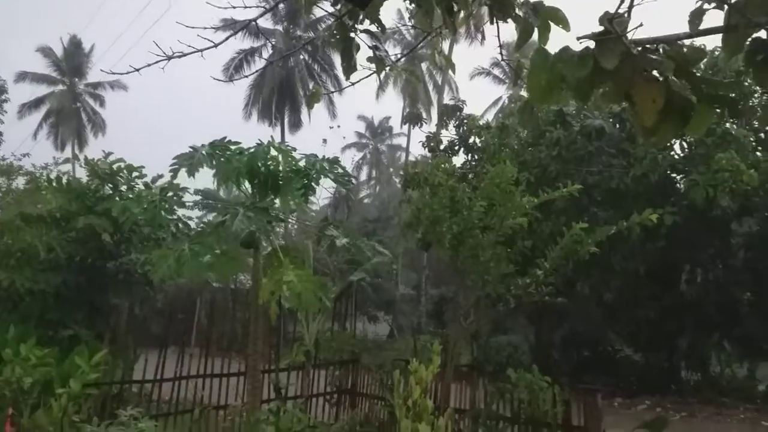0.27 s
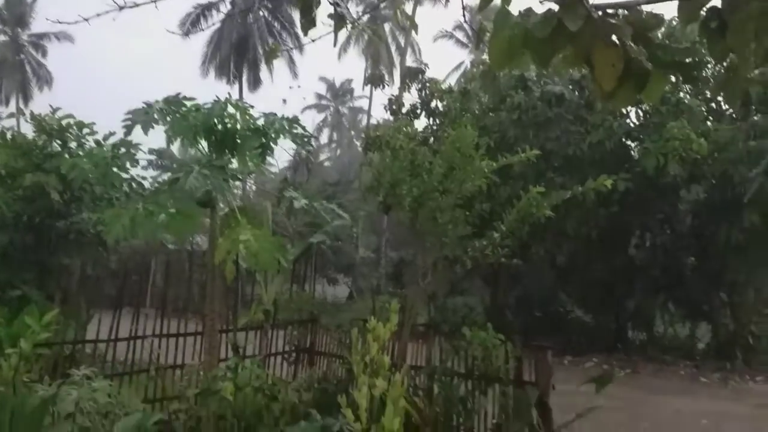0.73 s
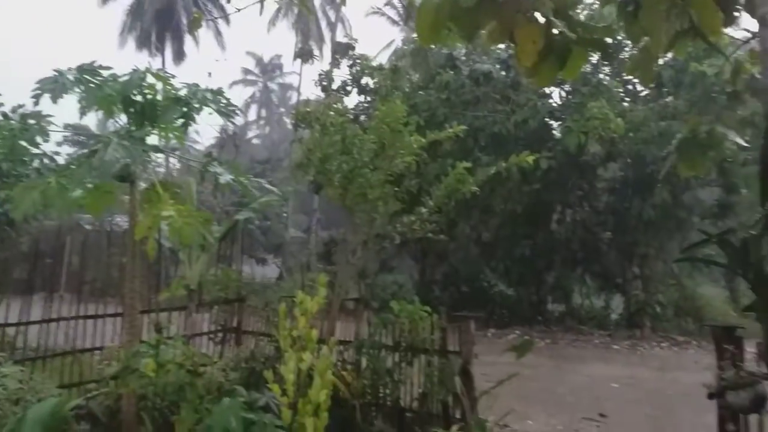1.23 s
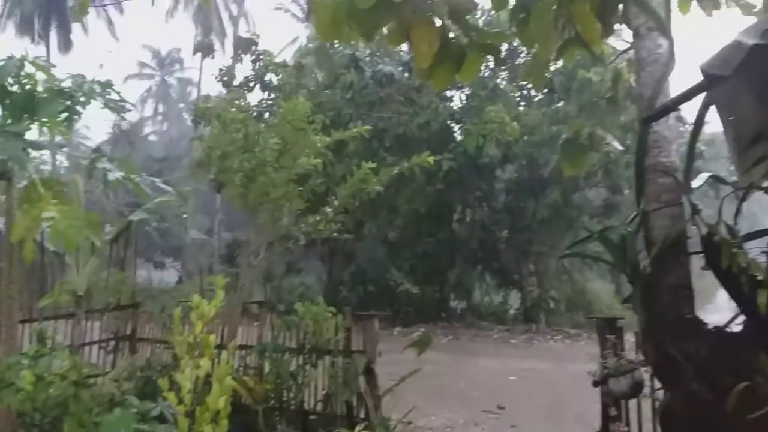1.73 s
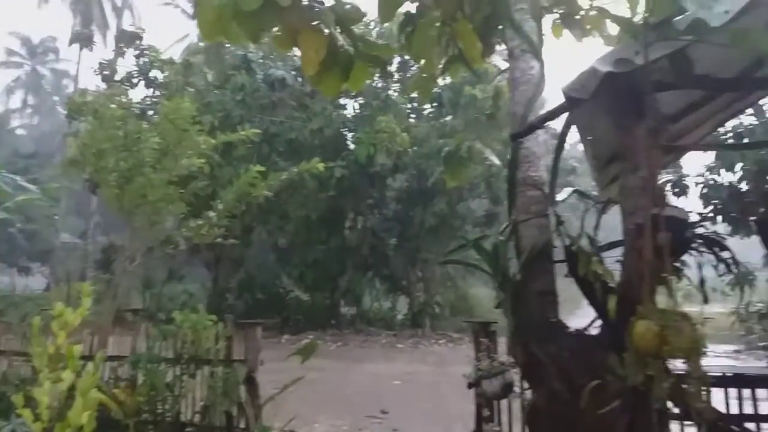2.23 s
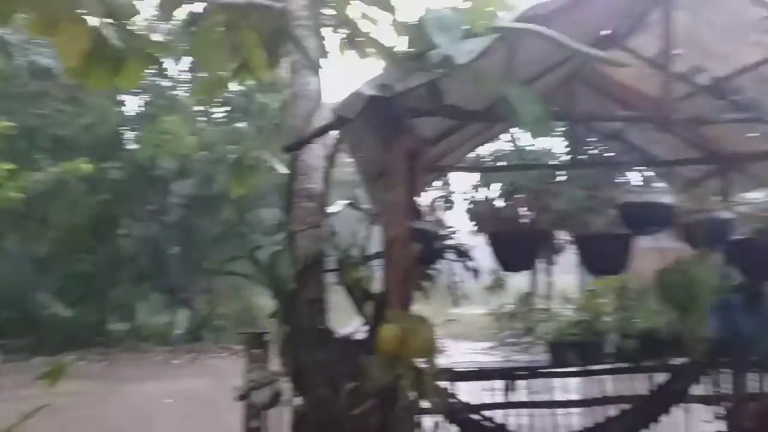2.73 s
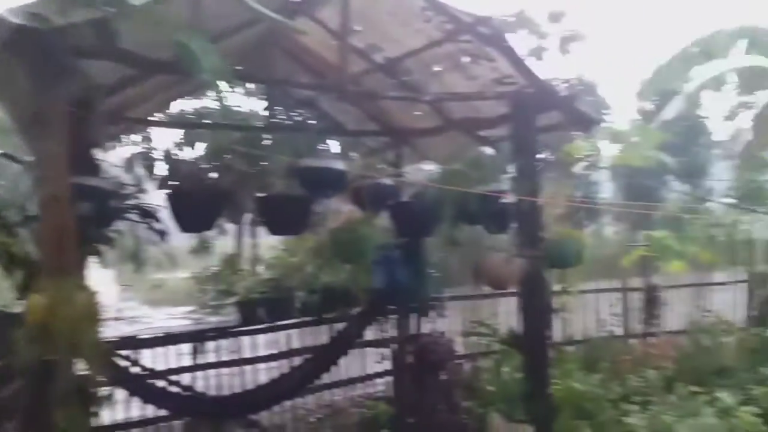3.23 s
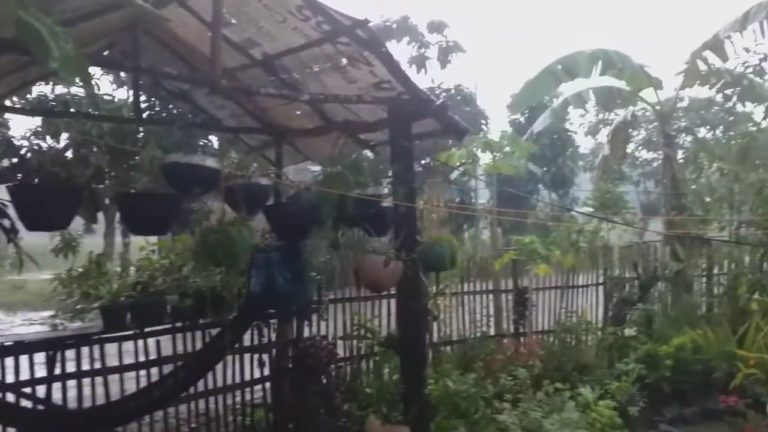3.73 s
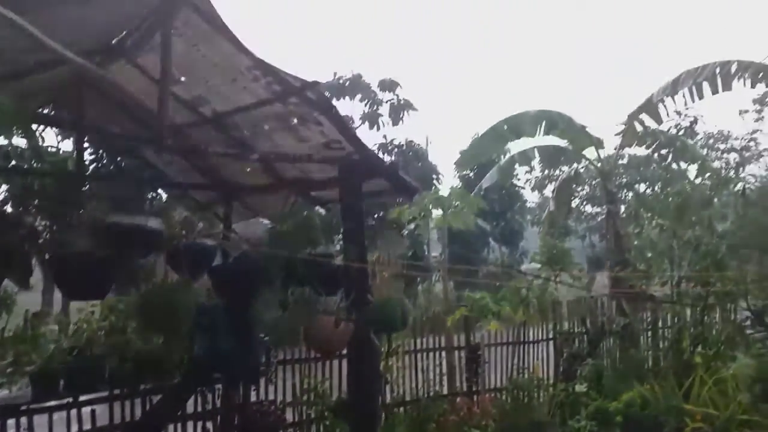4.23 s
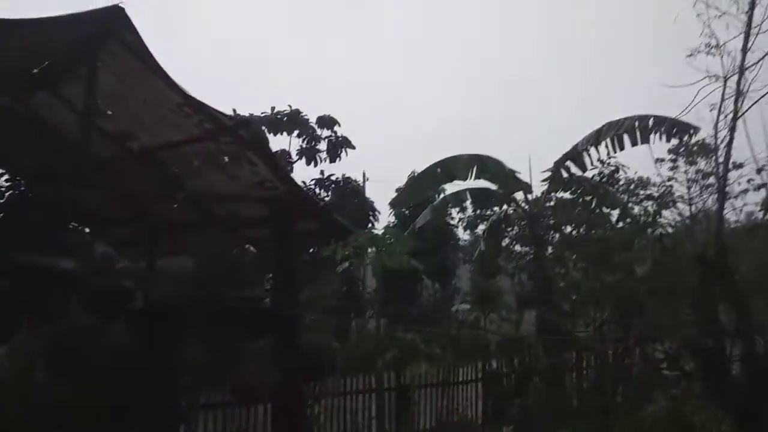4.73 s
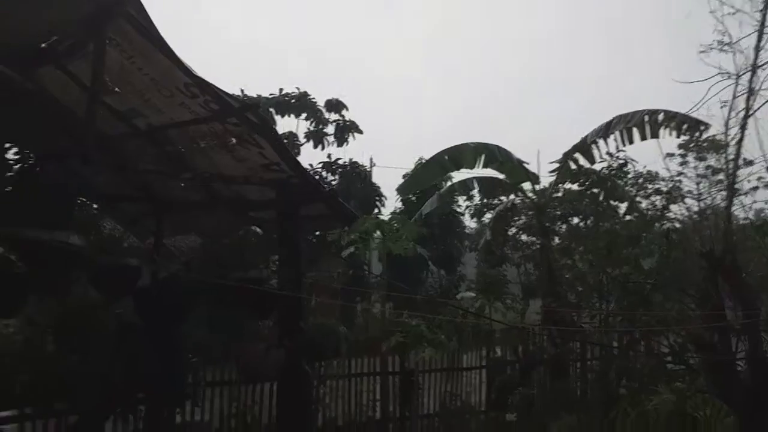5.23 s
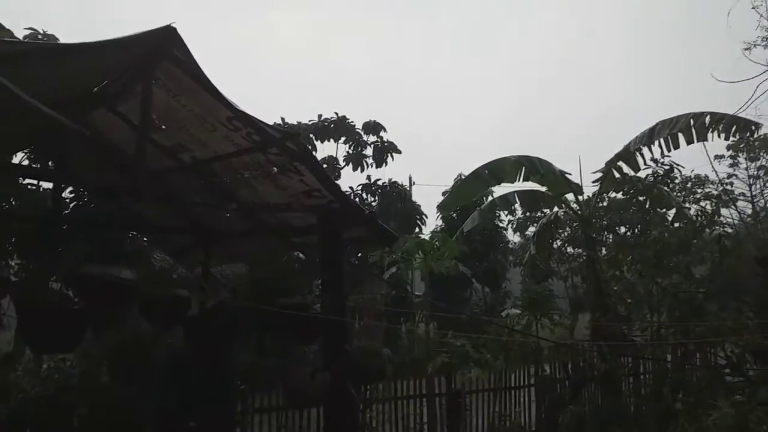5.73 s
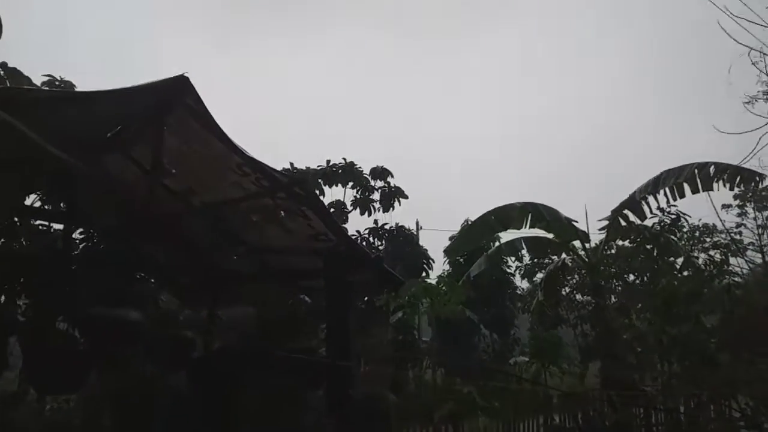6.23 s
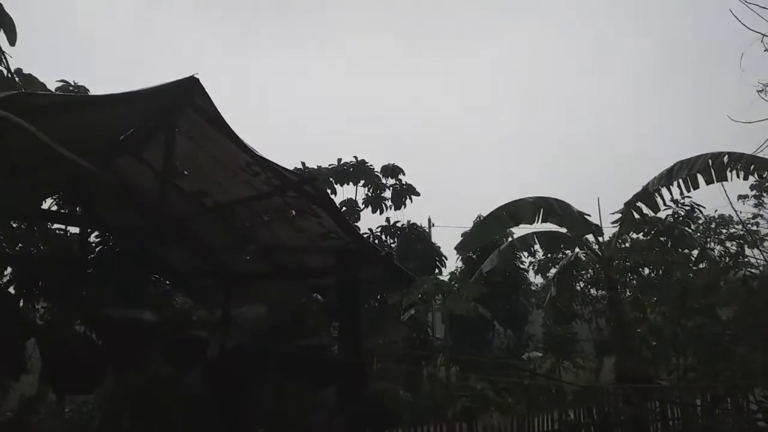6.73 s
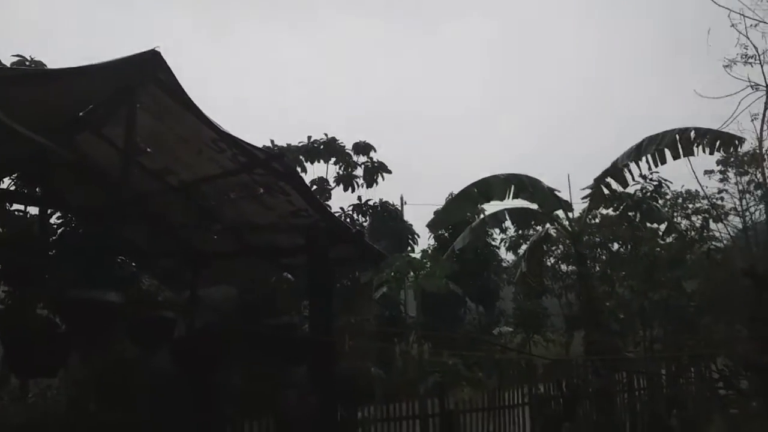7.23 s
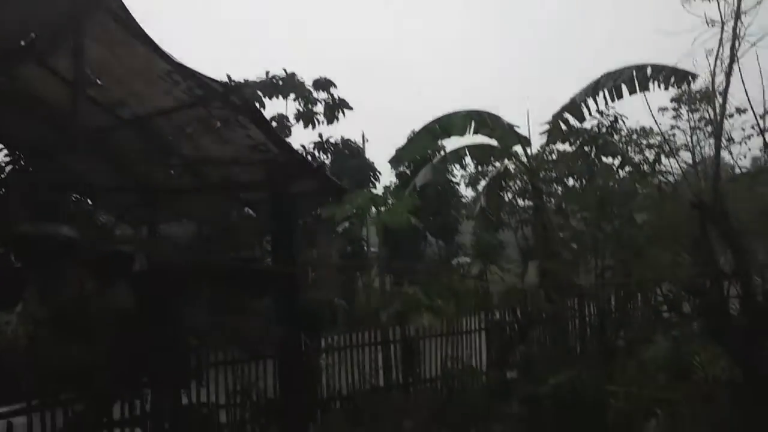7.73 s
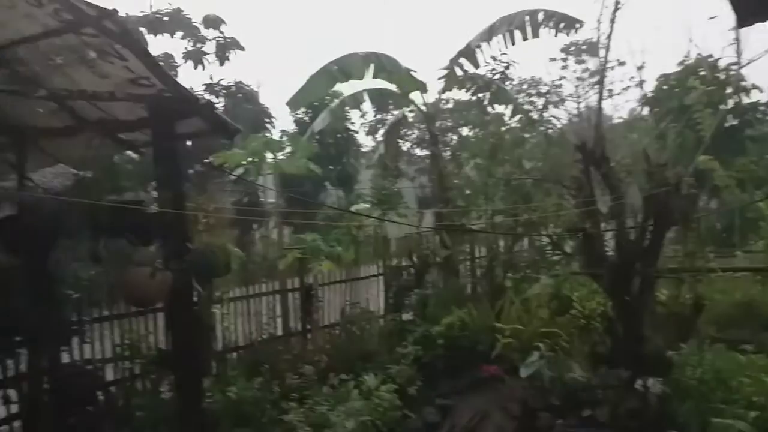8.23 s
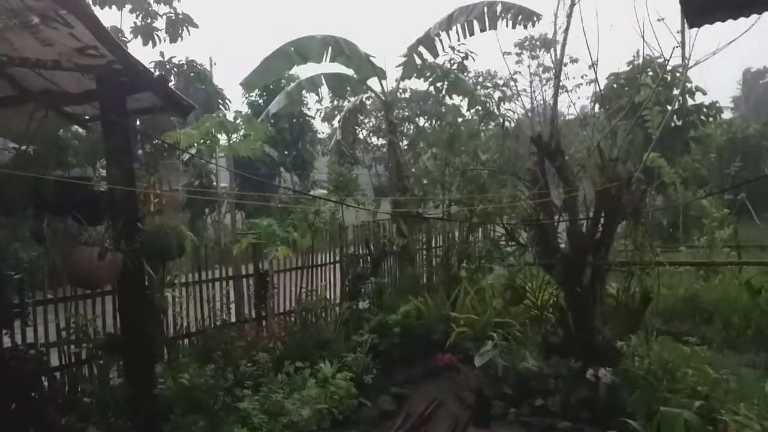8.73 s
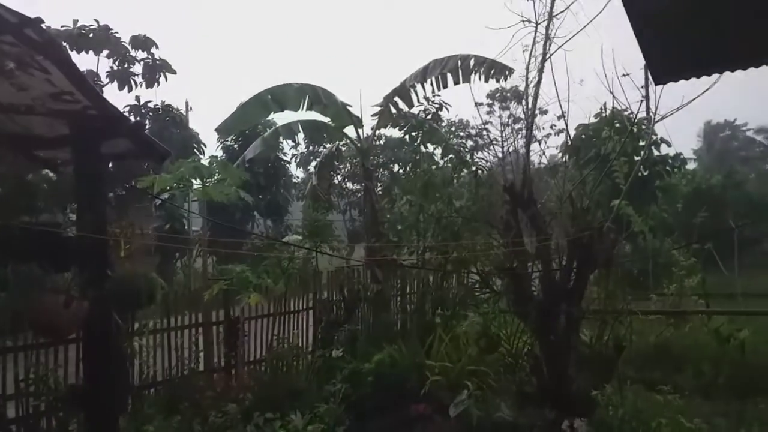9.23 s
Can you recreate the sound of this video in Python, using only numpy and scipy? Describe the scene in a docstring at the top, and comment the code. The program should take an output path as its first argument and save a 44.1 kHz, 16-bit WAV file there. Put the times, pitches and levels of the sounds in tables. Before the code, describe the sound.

Heard from a porch beside a tropical garden, strong wind roars through trees and heavy rain hisses on leaves throughout. It starts loud, with a squall throwing bright, sizzling spray close by until about 2.3 seconds. A drop clicks on the microphone at 1.3 seconds. The storm swells near 3 seconds, where two drops thump on the microphone with a brief wind rumble between them. The rush eases, with a small tick at 3.9 seconds, then rises again to a hard double knock and a short rumble at about 4.5 seconds. Wind and rain drop together into a lull from roughly 4.9 to 5.7 seconds, then surge back by 6 seconds and stay loud. Two soft, dull thumps come around 7.9 and 8.3 seconds. Another squall brightens the rain until about 8.8 seconds, and the rush continues to the end at 9.5 seconds.

```python
"""A porch at the edge of a tropical garden, in a typhoon; mono.
Wind roars through the trees, the downpour hisses on the leaves and nearer spray sizzles.
All three sink and swell together, dropping for about a second midway.
Squalls sweep past and throw the rain close by. Eddies rumble on the microphone port.
Stray drops click and thump on it, the hardest ducking the limiter for an instant."""
import sys
import numpy as np
from scipy import signal
from scipy.fft import rfft, irfft, next_fast_len
from scipy.io import wavfile
from scipy.ndimage import uniform_filter1d, minimum_filter1d

SR = 44100
rng = np.random.default_rng(int(sys.argv[2]) if len(sys.argv) > 2 else 0)


def unload_wav(signal):
    """Save mono or channel-first audio to the path in sys.argv[1] as 16-bit WAV at rate SR, clipped to [-1, 1]."""
    wavfile.write(
        sys.argv[1],
        SR,
        np.round(np.clip(np.atleast_2d(signal).T, -1, 1) * 32767).astype(np.int16),
    )


N = 418509
TIME_S = np.arange(N) / SR


def from_db(db):
    """Decibels to gain."""
    return 10 ** (np.asarray(db) / 20)


def unit_rms(x):
    """Scale to rms 1."""
    return x / np.sqrt(np.mean(x ** 2) + 1e-20)


def drift(rate_hz):
    """Slow random wander, rms 1: noise twice through a one-pole low-pass."""
    hop, settle = 40, 2000
    pole = np.exp(-2 * np.pi * rate_hz * hop / SR)
    noise = rng.standard_normal(N // hop + settle + 2)
    slow = signal.lfilter([1], [1, -2 * pole, pole * pole], noise)[settle:]
    return np.interp(np.arange(N) / hop, np.arange(len(slow)), unit_rms(slow))


def coloured(x, spectrum):
    """Give a flat excitation a spectrum; rms 1."""
    size = next_fast_len(N)
    hz, db = np.transpose(spectrum)
    bins_hz = np.maximum(np.fft.rfftfreq(size, 1 / SR), 1)
    gain = from_db(np.interp(np.log(bins_hz), np.log(hz), db))
    low_rolloff = np.minimum(bins_hz / hz[0], 1) ** 2
    return unit_rms(irfft(rfft(x, size) * gain * low_rolloff, size)[:N])


def resonance(x, hz, width_hz):
    """One resonance, peak gain 1."""
    return signal.lfilter(*signal.iirpeak(hz, hz / width_hz, fs=SR), x)


# eddy spectrum: f/Hz, relative density/dB
EDDY_SPECTRUM = [(25, -28), (55, -6), (90, -9), (140, -4), (300, -15), (1000, -55)]
# eddies on the port: t/s, level/dB, half-width/s
EDDIES = [(2.91, -30, 0.049), (4.568, -23, 0.018), (7.848, -33, .035)]


def port_eddies():
    """An eddy brushes the microphone port and rumbles for a moment."""
    swell = sum(from_db(db) * np.exp(-((TIME_S - at_s) / width_s) ** 2) for at_s, db, width_s in EDDIES)
    return swell * coloured(rng.standard_normal(N), EDDY_SPECTRUM)


# drops on the port, before filtering: t/s, click/dB, push/dB, push decay/ms, contact low-pass/Hz
PORT_DROPS = [(1.2878, 9, -2, 0.24, 5500), (2.8564, 12, 10.5, 0.9, 3400), (3.0057, 14, 15, 0.54, 3500),
              (3.8684, 2.5, -12, 0.88, 10000), (4.5486, 14, 1, 0.35, 9000), (4.5572, 21, 13, 1.8, 3600),
              (7.932, -20, 4, 1.2, 500), (8.2780, -20, 3.5, .4, 450)]


def port_drops(droplet_db, droplets_per_s):
    """A drop clicks, then plugs the port with a push; fine droplets only tick."""
    click_ms, notch_hz, notch_width_hz, low_cut_hz = 0.024, 8600, 8300, 112
    t_ms = np.arange(SR // 10) * 1000 / SR
    pulse = np.exp(-t_ms / click_ms)
    click = resonance(pulse, hz=3400, width_hz=2900)
    click += from_db(5) * resonance(pulse, hz=11800, width_hz=3000)
    landings = rng.random(N) < droplets_per_s / SR
    droplets = landings * from_db(droplet_db + rng.uniform(-16, 0, N))
    pressure = 1e-18 - signal.fftconvolve(droplets, click)[:N]
    for at_s, click_db, push_db, push_ms, contact_hz in PORT_DROPS:
        hit = from_db(click_db) * click + from_db(push_db) * np.exp(-t_ms / push_ms)
        start = round(at_s * SR)
        pressure[start:start + len(hit)] -= signal.lfilter(*signal.butter(2, contact_hz, fs=SR), hit)
    # the duct swallows the band between its two resonances
    ducted = signal.lfilter(*signal.iirnotch(notch_hz, notch_hz / notch_width_hz, fs=SR), pressure)
    # the low cut swings each push into a thump
    return signal.sosfilt(signal.butter(4, low_cut_hz, "high", fs=SR, output="sos"), ducted)


# squalls: start/s, end/s, foliage level/dB, spray level/dB, fade/(dB/s)
SQUALLS = [(0, 0.07, -31, -20, 8), (0, 2.3, -26.5, -19, 3.5), (2.7, 3.4, -30.5, -48, 9),
           (8.32, 8.83, -24, -30.5, 2.5)]


def squalls():
    """Each sweeps in, fades steadily and blows past; returns the power added to foliage and spray."""
    rise_s, fall_s = 0.09, 0.16
    foliage_power, spray_power = 0, 0
    for start_s, end_s, foliage_db, spray_db, fade_db_per_s in SQUALLS:
        rise = np.exp(-(np.maximum(start_s - TIME_S, 0) / rise_s) ** 2)
        fall = np.exp(-(np.maximum(TIME_S - end_s, 0) / fall_s) ** 2)
        elapsed_s = np.clip(TIME_S, start_s, end_s) - start_s
        swell = rise * fall * from_db(-fade_db_per_s * elapsed_s)
        foliage_power += (from_db(foliage_db) * swell) ** 2
        spray_power += (from_db(spray_db) * swell) ** 2
    return foliage_power, spray_power


def rain_level_db(downpour_db, squall_power):
    """Power sum of downpour and squalls."""
    return 10 * np.log10(from_db(downpour_db) ** 2 + squall_power)


def patter(drops_per_s, spread_db, far_db, sheets_db):
    """Impacts, many small and a few large, over the blur of far ones; wind throws them in sheets."""
    sheets = from_db(sheets_db * drift(rate_hz=12))
    sizes = from_db(spread_db * np.minimum(rng.exponential(1, N), 5))
    signs = rng.choice([-1, 1], N)
    landings = rng.random(N) < drops_per_s * sheets ** 2 / SR
    far_blur = from_db(far_db) * sheets * rng.standard_normal(N)
    return unit_rms(sizes * signs * landings) + far_blur


# spray spectrum: f/Hz, relative density/dB
SPRAY_SPECTRUM = [(1200, -23), (2800, -15.5), (3800, -5), (4500, -1), (5100, 0.5), (5900, -3.5),
                  (6600, -11), (7500, -22), (8900, -33), (10500, -26), (12000, -21), (13500, -18),
                  (15500, -23.5)]


def near_spray(level_db):
    """Spray lands close by and sizzles."""
    drops = patter(drops_per_s=4000, spread_db=3.0, far_db=0.5, sheets_db=0.8)
    return from_db(level_db) * coloured(drops, SPRAY_SPECTRUM)


# spectrum of rain on leaves: f/Hz, relative density/dB
FOLIAGE_SPECTRUM = [(600, -34), (1400, -3.5), (2000, -2), (2500, -1), (3200, 0), (4100, -1.5), (5200, -5.5),
                    (6000, -12), (7000, -20.5), (8000, -30.5), (8900, -34), (11200, -20.5), (13500, -23),
                    (15500, -30)]


def rain_on_foliage(level_db):
    """Dense impacts on the leaves merge into a hiss."""
    drops = patter(drops_per_s=7000, spread_db=2.5, far_db=1.0, sheets_db=0.23)
    return from_db(level_db) * coloured(drops, FOLIAGE_SPECTRUM)


# overall loudness of wind and rain: t/s, level/dB
LEVEL = [(0, -22), (0.55, -25), (1.3, -25.2), (1.55, -27), (2.25, -27.5), (2.65, -24.5), (3.0, -23.5),
         (3.35, -29.5), (4.08, -31.5), (4.3, -26.6), (4.54, -25), (4.92, -34), (5.68, -35.0), (5.8, -26.9),
         (6.08, -22), (6.9, -21.0), (8.0, -22.5), (9.49, -22.5)]


def level_swing_db():
    """Overall loudness about its mean; drops for about a second midway."""
    level_db = np.interp(TIME_S, *np.transpose(LEVEL))
    return level_db - level_db.mean()


# spectrum of wind in trees: f/Hz, relative density/dB
ROAR_SPECTRUM = [(25, -51), (50, -23.5), (80, -14), (110, -4), (175, -5.5), (290, 0.5), (620, 0), (850, 1),
                 (1500, -2.5), (2100, -8), (4500, -23), (8900, -37.5), (12400, -19.5), (15500, -35)]


def wind_in_trees(level_db, buffet_db):
    """Countless leaves and branches merge into a smooth roar, lightly buffeted."""
    gain = from_db(level_db + buffet_db * drift(rate_hz=0.57))
    return gain * coloured(rng.standard_normal(N), ROAR_SPECTRUM)


def scene():
    """Wind, rain, spray and what hits the port, the same in both channels."""
    mean_wind_db, mean_foliage_db, mean_spray_db = -25, -28, -41
    rain_lag_s, foliage_follows, spray_follows = 0.017, 0.9, 0.92
    swing_db = level_swing_db()
    late_swing_db = np.interp(TIME_S - rain_lag_s, TIME_S, swing_db)
    foliage_squalls, spray_squalls = squalls()
    foliage_db = rain_level_db(mean_foliage_db + foliage_follows * late_swing_db, foliage_squalls)
    spray_db = rain_level_db(mean_spray_db + spray_follows * late_swing_db, spray_squalls)
    wind = wind_in_trees(mean_wind_db + swing_db, buffet_db=0.23)
    rain = rain_on_foliage(foliage_db) + near_spray(spray_db)
    port = port_drops(droplet_db=foliage_db + 10, droplets_per_s=3.4) + port_eddies()
    return np.tile(wind + rain + port, (2, 1))


def limiter(x, ceiling_db, attack_s, release_db_per_s):
    """The gain dips just ahead of a peak over the ceiling and recovers within milliseconds."""
    peak_db = 20 * np.log10(np.abs(x).max(axis=0) + 1e-9)
    over_db = np.maximum(peak_db - ceiling_db, 0)
    release_db = release_db_per_s * TIME_S
    gain_db = release_db - np.maximum.accumulate(over_db + release_db)
    size = 2 * int(attack_s * SR / 2) + 1
    ahead_db = minimum_filter1d(gain_db, size, origin=-(size // 2))
    return x * from_db(uniform_filter1d(ahead_db, size, origin=size // 2))


def record(dry):
    """Peak limiter, then a steep low-pass."""
    cutoff_hz = 15550
    limited = limiter(dry, ceiling_db=-0.8, attack_s=0.002, release_db_per_s=2400)
    return signal.sosfilt(signal.ellip(12, 0.1, 90, cutoff_hz, fs=SR, output="sos"), limited)


dry = scene()
out = record(dry)
unload_wav(out)
```